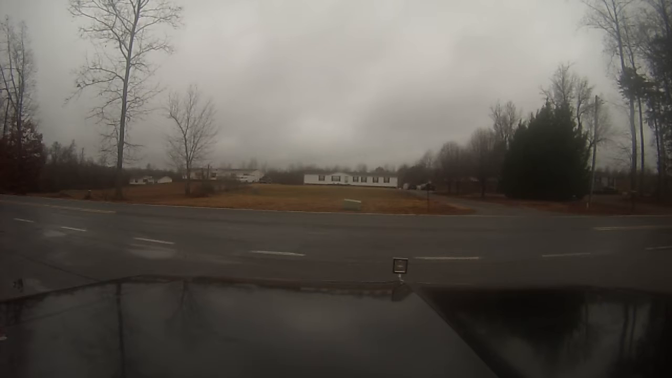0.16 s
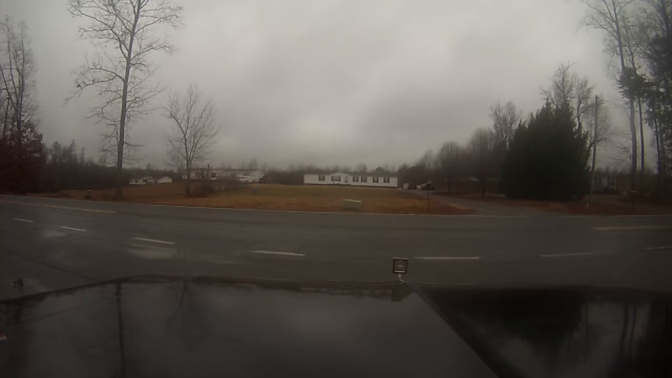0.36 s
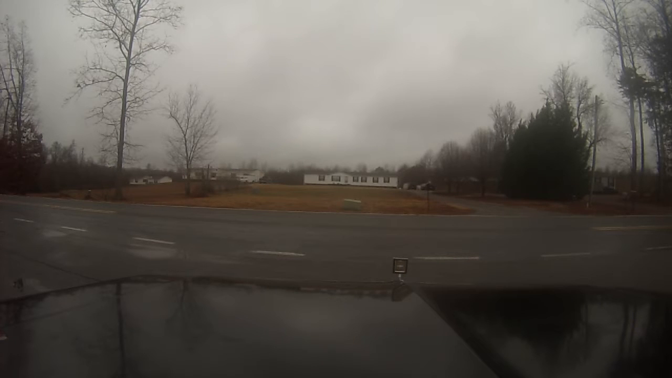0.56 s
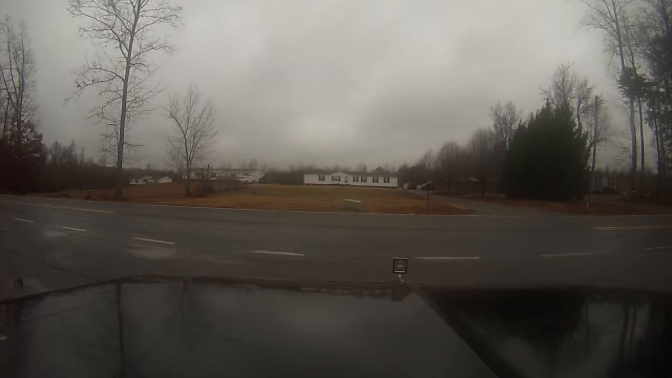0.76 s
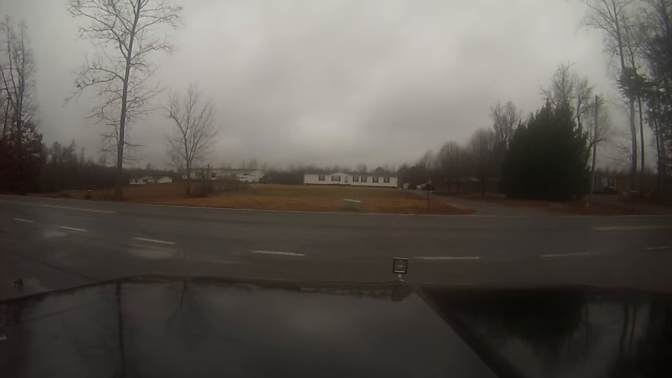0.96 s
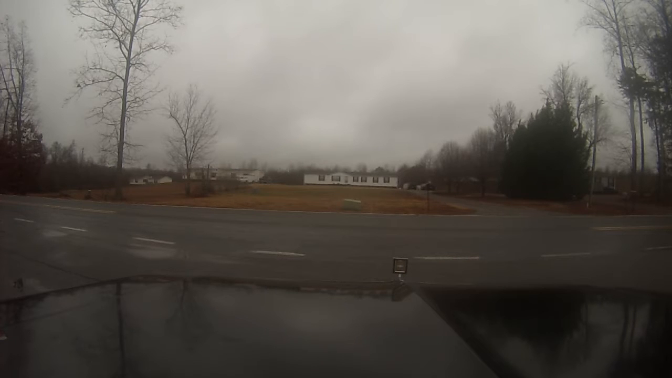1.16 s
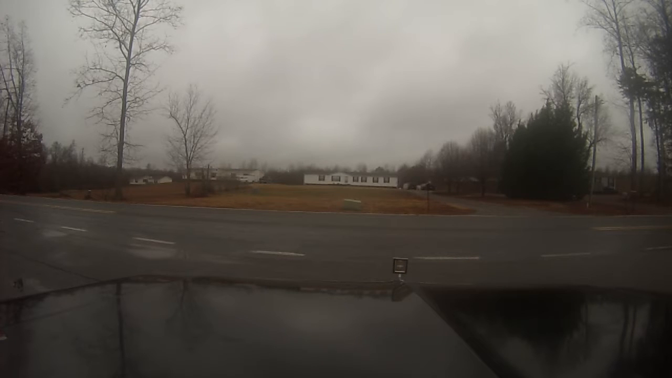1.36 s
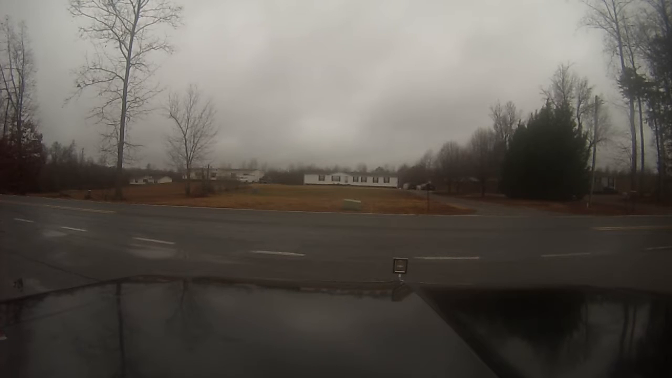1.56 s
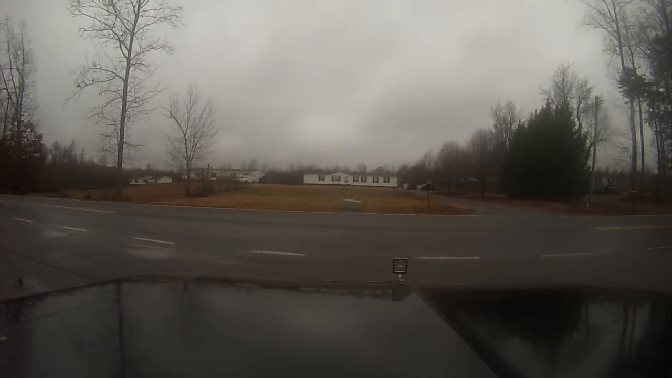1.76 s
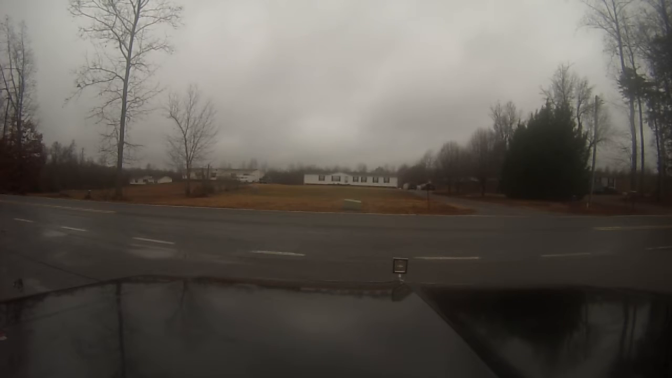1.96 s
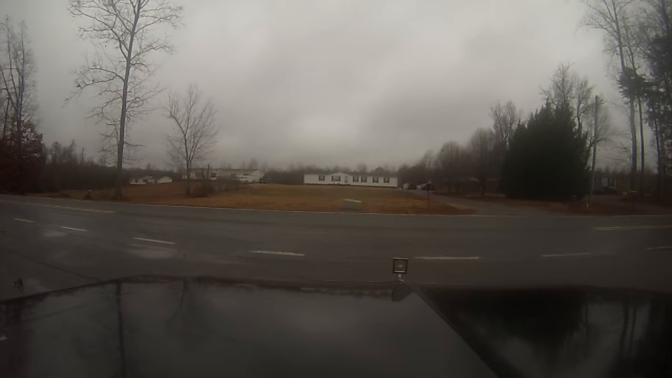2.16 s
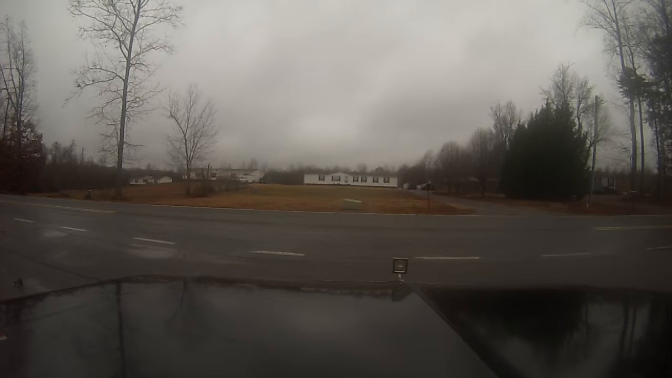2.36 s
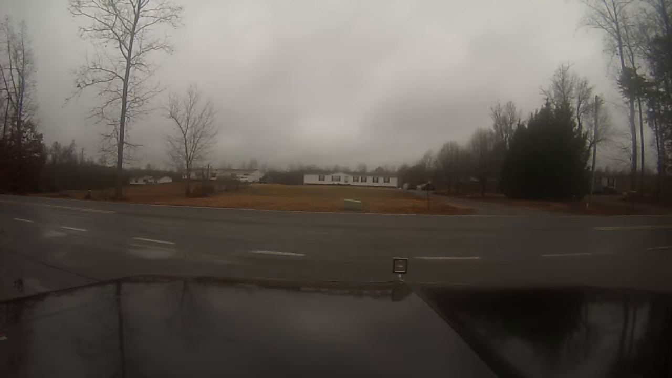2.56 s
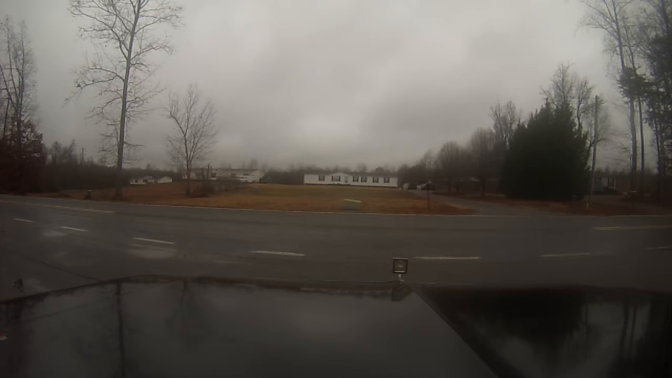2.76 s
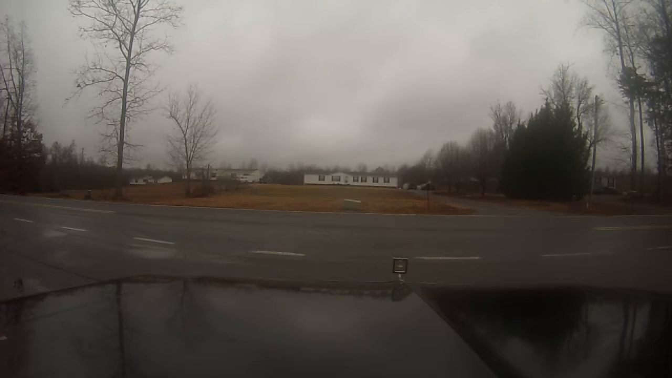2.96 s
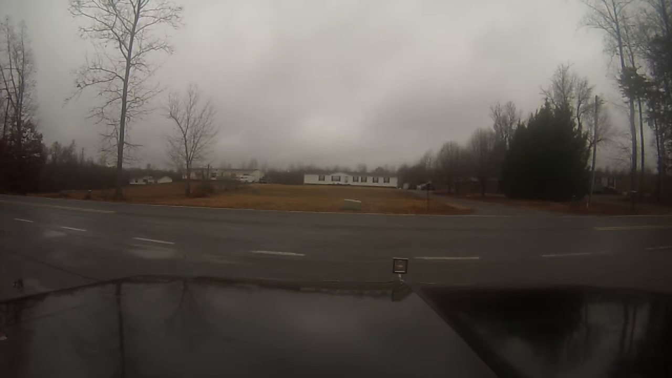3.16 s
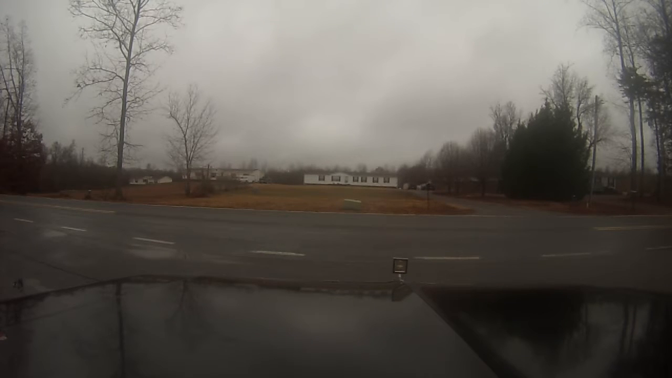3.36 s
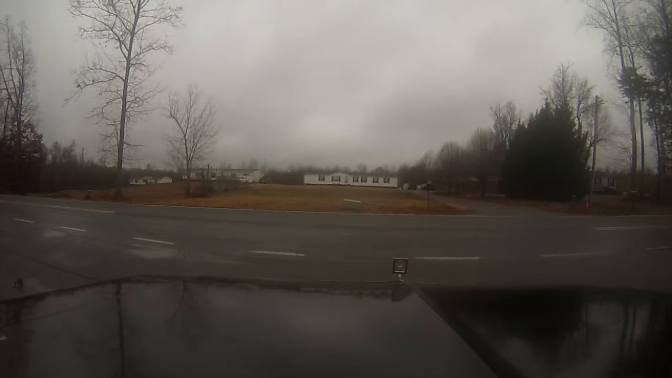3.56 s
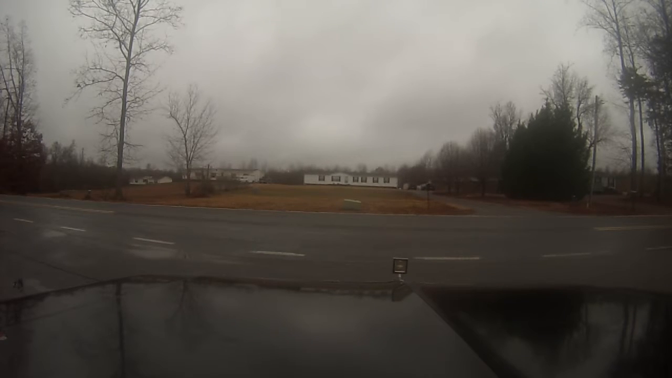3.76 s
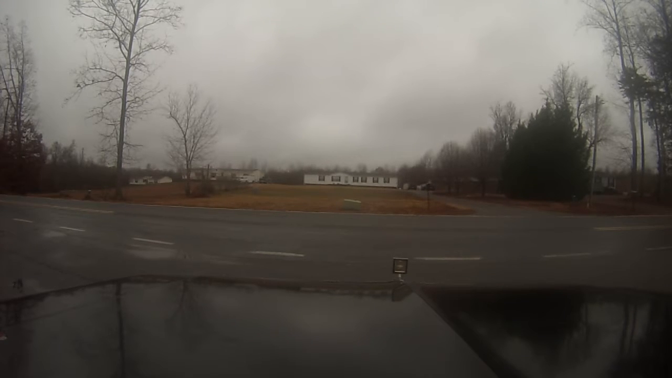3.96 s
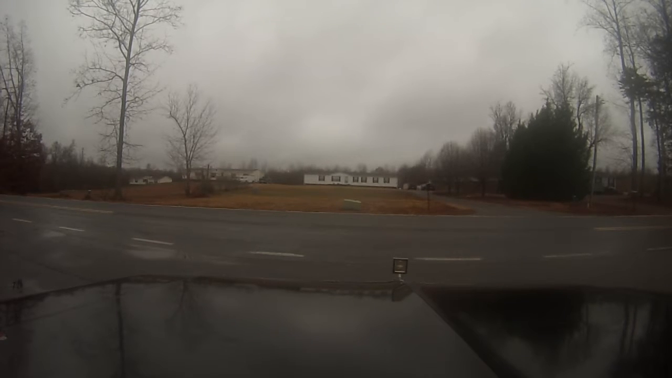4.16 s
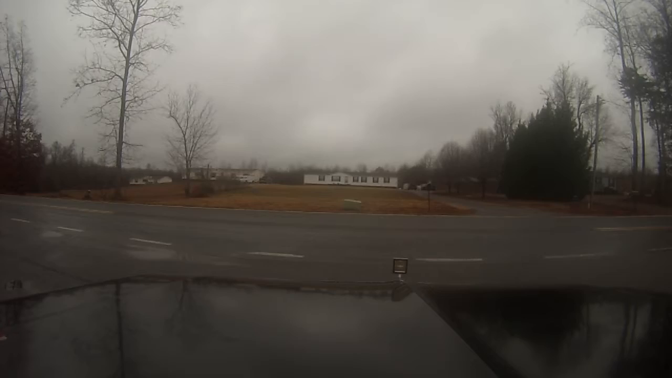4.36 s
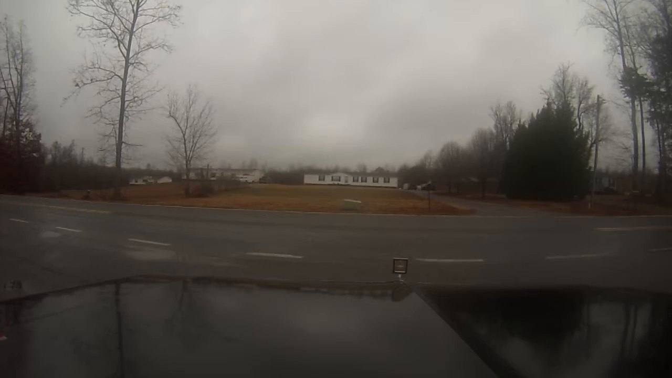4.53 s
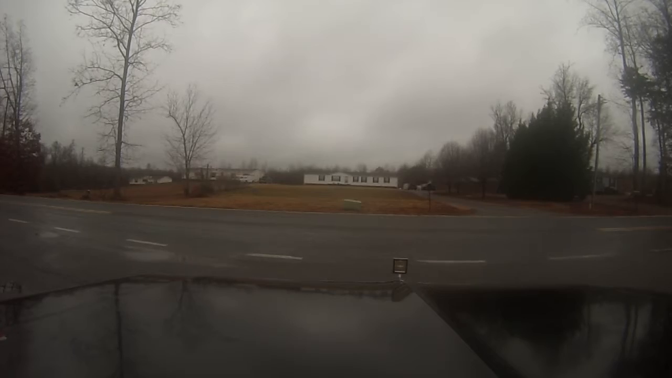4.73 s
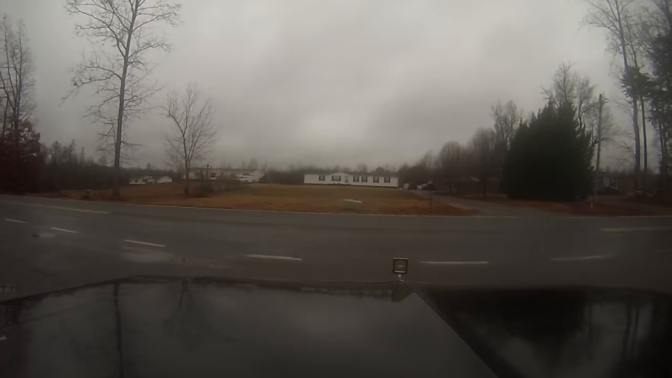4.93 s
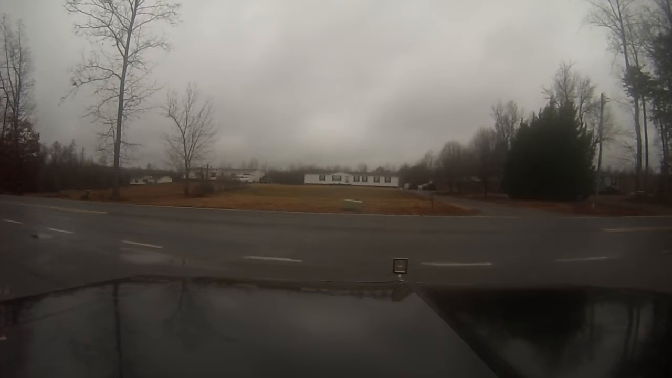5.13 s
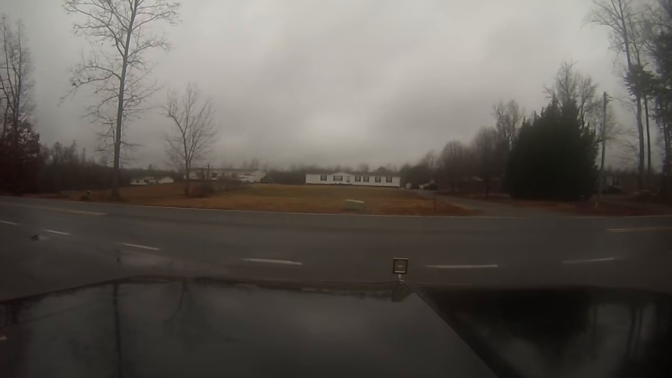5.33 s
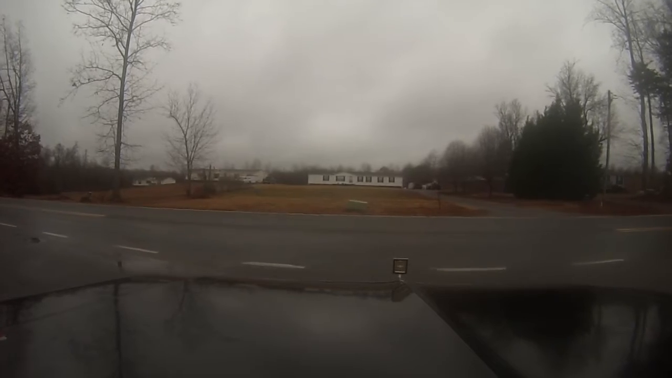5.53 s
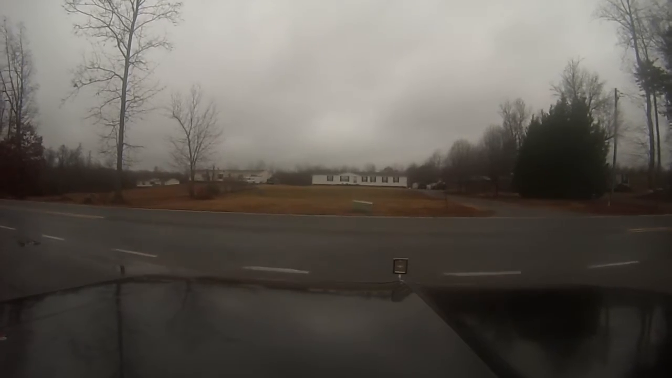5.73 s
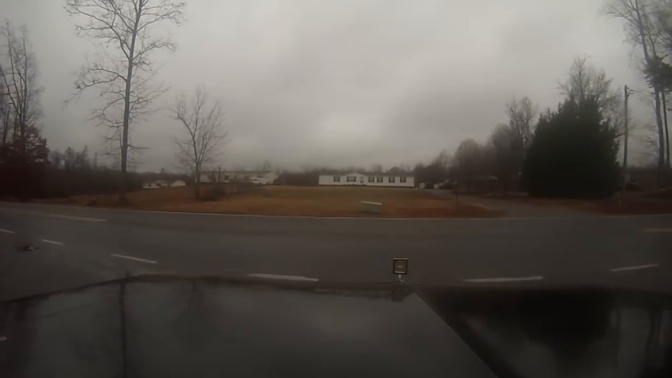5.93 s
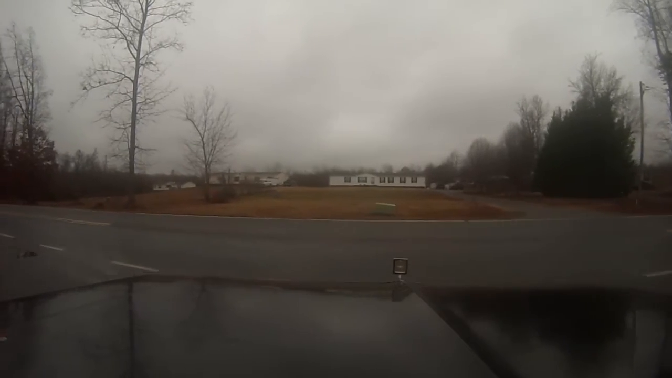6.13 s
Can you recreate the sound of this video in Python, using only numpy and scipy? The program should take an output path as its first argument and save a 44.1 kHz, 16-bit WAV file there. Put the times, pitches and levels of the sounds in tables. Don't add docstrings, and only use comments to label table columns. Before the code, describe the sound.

Lumpy truck idle heard from inside the cab for several seconds, then rising engine drone, intake hiss and ticking trim as it drives off.

```python
import sys
import numpy as np
from scipy import signal
from scipy.fft import rfft, irfft, next_fast_len
from scipy.io import wavfile
from scipy.ndimage import uniform_filter1d, map_coordinates

SR = 44100
rng = np.random.default_rng(int(sys.argv[2]) if len(sys.argv) > 2 else 0)


def wav_record(signal):
    frames = np.transpose(np.atleast_2d(signal))
    bounded = np.clip(frames, -1, 1)
    quanta = np.round(bounded * 32767).astype(np.int16)
    wavfile.write(sys.argv[1], SR, quanta)


def field_ratio(decibels):
    return 10 ** (np.asarray(decibels, dtype=float) / 20)


N = 277389


# time in seconds, crankshaft speed in turns per second.
CRANK_SPEED = [(0, 9.45), (1.5, 9.4), (3, 9.45), (4.5, 9.43), (4.7, 10.6), (5, 11.6), (5.15, 12.6),
               (5.4, 16.1), (5.55, 17.6), (5.7, 18.2), (5.76, 20.6), (5.85, 22.3), (5.95, 24.6),
               (6.05, 25.8), (6.15, 27.3), (6.29, 28.6)]


def crank():
    speed = curves(CRANK_SPEED)[0]
    revved = np.clip((speed - 9.5) / 8, 0, 1)
    return np.cumsum(speed) / SR, revved


# time in seconds, effort in dB over idle.
EFFORT = [(0, 0.5), (4.4, 0.5), (4.7, 2.5), (5, 3), (5.2, 5.5), (5.45, 7.5), (5.62, 9.5), (5.7, 11.5),
          (5.76, 14), (5.81, 12.5), (5.86, 14), (5.905, 8), (5.94, 13.5), (6.03, 5.5), (6.11, 10.5),
          (6.17, 10), (6.29, 13.5)]


def effort():
    return curves(EFFORT)[0]


CYLINDER_DB = [-6, -4, -1.5, -10.5, -15, -2, -10.5, -14]


def rumble(turns, scatter_db, noise_share):
    firing = np.floor(4 * turns).astype(int)
    at = np.flatnonzero(np.diff(firing))
    cylinder = firing[at] % len(CYLINDER_DB)
    scatter = scatter_db * rng.standard_normal(len(at))
    pulses = np.zeros(N)
    pulses[at] = field_ratio(np.take(CYLINDER_DB, cylinder) + scatter)
    pulses /= np.sqrt(np.gradient(4 * turns))
    push = np.sqrt(1 - noise_share) * pulses + np.sqrt(noise_share) * rng.standard_normal(N)
    return unit(filtered(push * field_ratio(0.96 * effort()), cab)) * field_ratio(-26.5)


# frequency in Hz, width in Hz, level in dB.
CAB_MODES = [(17, 5.9, -16), (62.3, 22, -10), (74.4, 12, -14.5), (97.2, 26, -6.5), (108.5, 9.2, -3.5),
             (143.1, 51, -4.5), (161.8, 11, -5), (199.5, 24, -6.5), (222, 23, -13), (263.4, 41, -11),
             (284.2, 15, -13), (301.2, 11, -15), (338.3, 22, -17), (355.6, 20, -15.5), (386, 16, -17),
             (402.1, 20, -16.5)]
# frequency in Hz, width in Hz, level in dB.
DOOR_ROOF_MODES = [(428, 30, -6), (465, 30, -6), (505, 40, -3), (540, 30, -9), (567, 16, -5)]


def cab(f):
    table = CAB_MODES + [(hz, width, db - 18.5) for hz, width, db in DOOR_ROOF_MODES]
    modes = np.array([(-1) ** k * field_ratio(db) * mode(f, hz, width) ** 2
                      for k, (hz, width, db) in enumerate(table)])
    residual = field_ratio(2 * -24) / (1 + (f / 260) ** 4) * (f > 45)
    power = np.sum(np.abs(modes) ** 2, axis=0) + residual
    return np.sqrt(power) * np.exp(1j * np.angle(modes.sum(axis=0)))


# multiple of shaft speed, level in dB rms.
LOW_ORDERS = [(4, -42), (5.5, -54), (8, -50), (12, -52), (2, -60), (2.5, -63), (16, -70)]
# order, time in seconds, peak in dB rms, length in seconds.
ORDER_SWEEPS = [(4, 5.2, -32, .15), (4, 5.45, -27, .1), (4, 5.62, -21.5, .07), (4, 5.84, -24, .035),
                (4, 6.13, -19, .16), (5.5, 5.53, -26, .1), (5.5, 6.2, -23, .15), (8, 4.7, -33, .09),
                (8, 5.15, -25, .07), (8, 5.6, -35, .3), (8, 6.25, -28, .2), (12, 5.02, -21, .07),
                (16, 5.47, -32, .08), (12, 5.55, -26, .13), (12, 6, -44, .3), (2, 5.87, -32, .15),
                (2, 6.24, -30, .1), (2.5, 5.85, -39, .2), (2.5, 6.18, -33, .1)]
# order, level in dB rms, unsteadiness in dB.
DRIVE_LINES = [(16, -42, 1.5), (18, -36, 1), (20, -50, 1.5), (24, -47, 1.5)]


def orders(turns, revved):
    out = np.zeros(N)
    for multiple, idle_db in LOW_ORDERS:
        crossings = [row[1:] for row in ORDER_SWEEPS if row[0] == multiple]
        out += swells(crossings, idle_db) * order(turns, multiple, 0.87 * wobble(8.9))
    for multiple, db, unsteady_db in DRIVE_LINES:
        out += order(turns, round(multiple), db - 90 * revved + unsteady_db * wobble(6))
    return out


def order(turns, multiple, level_db):
    phase = 2 * np.pi * (multiple * turns + rng.random()) + 0.42 * wobble(5.0)
    return np.sqrt(2) * field_ratio(level_db) * np.sin(phase)


# time in seconds, pitching in dB, bouncing in dB.
MOUNT_SHAKE = [
    (0, -60, -53),
    (.5, -53.5, -28.5),
    (2, -44, -35.5),
    (3.4, -45, -31),
    (3.75, -27.5, -30),
    (4.4, -28, -33),
    (5.05, -31.5, -43),
    (5.4, -27.5, -28.5),
    (5.95, -30, -30),
    (6.29, -40.5, -44),
]


def rocking():
    pitching_hz, beat_s, in_step_s = 19.2, .205, 3.73
    since = np.arange(N) / SR - in_step_s
    out = np.zeros(N)
    for hz, db in zip((pitching_hz, pitching_hz + 1 / beat_s), curves(MOUNT_SHAKE)):
        phase = 2 * np.pi * hz * since + .4 * wobble(6)
        out += np.sqrt(2) * field_ratio(db + 2.3 * wobble(5)) * np.sin(phase)
    return out


# time in seconds, peak in dB, length in seconds.
BOOM_SURGES = [(.19, -20, 0.034), (.42, -22, .06), (.62, -24, .05), (.84, -24.5, 0.052), (1.27, -22.5, .06),
               (1.47, -23, 0.081), (1.92, -24, .1), (2.57, -18.5, 0.051), (3.41, -20, 0.024),
               (3.72, -22.5, 0.04), (3.88, -26.5, .1), (4.04, -23.5, 0.046), (4.25, -33, .04),
               (4.67, -24, 0.047), (4.93, -17, .06), (5.19, -17, 0.033), (5.3, -15, 0.035),
               (5.47, -17, 0.027), (5.58, -15.5, 0.047), (5.86, -12.5, 0.051), (6, -12, 0.037),
               (6.13, -17, .03), (6.28, -13, 0.025)]


def boom(turns, revved):
    kick_at, kick_sharpness = 0.97, 6.1
    cycle = 2 * np.pi * (turns / 2 - kick_at)
    kick = np.exp(kick_sharpness * (np.cos(cycle) - 1)) * (1 - revved)
    bed_db = -32.5 + 0.49 * effort() + 9.5 * kick + 2.13 * wobble(9)
    return swells(BOOM_SURGES, bed_db) * field_ratio(-3.26) * wandering(hz=136.2, spread_hz=2.02, rate=14)


# time in seconds, peak in dB, length in seconds.
DRONE_SURGES = [
    (4.72, -34, .1),
    (5.0, -30.5, 0.091),
    (5.43, -25, 0.044),
    (5.62, -23.5, 0.046),
    (5.73, -24, 0.055),
    (5.96, -22, 0.032),
]


def floor_drone():
    bed_db = -39.5 + 1.09 * effort() + 2.0 * wobble(11)
    ring = wandering(hz=266 + 3 * wobble(5), spread_hz=7, rate=18)
    return swells(DRONE_SURGES, bed_db) * field_ratio(-4.0) * ring


# time in seconds, peak in dB, length in seconds.
PANE_SURGES = [
    (1.14, -37, 0.035),
    (2.42, -40.5, 0.016),
    (4.64, -39, 0.028),
    (5.31, -35.5, 0.042),
    (5.76, -30.5, 0.04),
]


def windscreen():
    bed_db = -48 + 0.33 * effort() + 4 * wobble(6)
    push = field_ratio(-7.5 + 3.3 * wobble(20))
    return swells(PANE_SURGES, bed_db) * push * wandering(hz=493.8, spread_hz=10.04, rate=24)


# time in seconds, peak in dB, length in seconds.
WHINE_SURGES = [
    (1.24, -45, 0.062),
    (2.96, -48, 0.037),
    (4.51, -36.5, 0.04),
    (5.65, -34.5, 0.046),
    (5.92, -34, 0.024),
]


def alternator():
    bed_db = -50 + 0.77 * effort() + 1.5 * wobble(5.5)
    push = field_ratio(-6 + 2.5 * wobble(35))
    return swells(WHINE_SURGES, bed_db) * push * wandering(hz=1414, spread_hz=24, rate=45)


# frequency in Hz, level in dB per Hz.
GEAR_SPECTRUM = [(250, -120), (500, -3.5), (700, -10), (1400, -3), (2200, -9.5), (2850, -20), (3100, -15),
                 (3900, -19.5), (4400, -21.5), (4650, -31.5), (5200, -63.5), (5600, -120)]


def gear_hiss(turns, revved):
    gate = 1 + 0.051 * np.cos(8 * np.pi * turns)
    gear = field_ratio(-46 + effort()) * gate * patchy(GEAR_SPECTRUM, depth_db=0.72)
    top = filtered(gear, lambda f: 1 / (1 + (2400 / (f + 1)) ** 8))
    low = filtered(gear, lambda f: 1 / (1 + (f / 1250) ** 6))
    return gear + (field_ratio(-4 * revved) - 1) * top + (field_ratio(2.9 * revved) - 1) * low


# frequency in Hz, level in dB per Hz.
AIR_SPECTRUM = [(3800, -120), (4500, -6.5), (4900, -1), (5600, -2.5), (5850, -5), (7000, -7), (8000, -9),
                (10000, -13.5), (12000, -18.5), (14000, -26), (15500, -37)]
# time in seconds, peak in dB, length in seconds.
INTAKE_GULPS = [
    (5.8, -59.5, 0.092),
    (5.95, -62, .03),
    (6.27, -61, 0.065),
]


def intake(revved):
    flutter = field_ratio(1.8 * revved * wobble(40))
    return swells(INTAKE_GULPS, -66.5 + 0.36 * effort()) * flutter * patchy(AIR_SPECTRUM, depth_db=0.9)


# frequency in Hz, width in Hz, height in dB over the trend.
DASH_MODES = [(770, 38, 10), (940, 50, 10), (1155, 60, 5), (1310, 90, 7), (1425, 100, 6), (1645, 65, 5),
              (1795, 45, 3), (1940, 45, 5), (2075, 120, 8), (2380, 160, 5), (2600, 120, 6), (3230, 160, 4),
              (4140, 90, 4), (4940, 120, 2), (6230, 120, 2)]


def dash(f):
    extra = sum((field_ratio(2 * abs(db)) - 1) * abs(mode(f, hz, width)) ** 4 for hz, width, db in DASH_MODES)
    return np.sqrt(1 + extra)


def patchy(spectrum, depth_db):
    z = signal.stft(rng.standard_normal(N), nperseg=512)[2]
    field = uniform_filter1d(rng.standard_normal(z.shape), size=5, axis=0)
    field = uniform_filter1d(field, size=8, axis=1)
    noise = signal.istft(z * field_ratio(depth_db * unit(field)), nperseg=512)[1][:N]
    hz, db = np.transpose(spectrum)
    return unit(filtered(noise, lambda f: field_ratio(np.interp(np.log(f + 1), np.log(hz), db)) * dash(f)))


# time in seconds, peak in dB, ring frequency in Hz.
TRIM_CHINKS = [
    (5.249, -49, 6670),
    (5.488, -52, 6800),
    (5.704, -47, 6850),
    (5.744, -49, 7000),
    (5.768, -42, 6220),
    (5.772, -52, 5000),
    (5.806, -48, 6800),
    (5.932, -48, 6200),
    (6.046, -52, 6700),
    (6.189, -53, 7900),
]


def chinks():
    out, t = np.zeros(N + SR), np.arange(SR // 20) / SR
    u = rng.random((90, 3))
    swarm = np.c_[5.3 + .97 * u[:, 0] ** .7, -65 + 9 * u[:, 1], 5600 + 2600 * u[:, 2]]
    for s, db, hz in [*TRIM_CHINKS, *swarm]:
        ring = np.sin(2 * np.pi * hz * t + np.cumsum(rng.normal(0, .08, len(t))))
        decay = field_ratio(db - 60 * t / .045)
        out[round(s * SR):][:len(t)] += decay * (1 - np.exp(-t / .002)) * ring
    return out[:N]


# time in seconds, peak in dB.
TRIM_TICKS = [
    (5.545, -52),
    (5.645, -52),
    (5.878, -48),
    (5.932, -45),
    (5.965, -49),
]


def ticks():
    out, t = np.zeros(N + SR), np.arange(SR // 20) / SR
    for s, db in TRIM_TICKS:
        decay = field_ratio(db + 3 - 60 * t / .02)
        out[round(s * SR):][:len(t)] += decay * rng.standard_normal(len(t))
    return filtered(out[:N], lambda f: mode(f, 6200, 5000) ** 3)


def mode(f, hz, width):
    return 1j * f * width / (hz * hz - f * f + 1j * f * width)


def wandering(hz, spread_hz, rate):
    return np.sqrt(2) * np.sin(2 * np.pi * np.cumsum(hz + spread_hz * wobble(rate)) / SR)


def swells(rows, bed_db):
    t = np.arange(N) / SR
    surges = sum(field_ratio(2 * db) * np.exp(-((t - s) / length) ** 2) for s, db, length in rows)
    return np.sqrt(field_ratio(2 * bed_db) + surges)


def filtered(x, response):
    m = next_fast_len(N + SR // 2)
    return irfft(rfft(x, m) * response(np.fft.rfftfreq(m, 1 / SR)), m)[:N]


def wobble(rate):
    steps = np.arange(0, N + 64, 64)
    knots = rng.standard_normal(400)
    return np.interp(np.arange(N), steps, map_coordinates(knots, [steps * min(rate, 60) / SR]))


def curves(rows):
    s, *cols = np.transpose(rows)
    return [np.interp(np.arange(N) / SR, s, c) for c in cols]


def unit(x):
    return x / np.sqrt(np.mean(x ** 2) + 1e-20)


def scene():
    turns, revved = crank()
    engine = rumble(turns, scatter_db=6.0, noise_share=0.94) + orders(turns, revved)
    body = rocking() + boom(turns, revved) + floor_drone()
    panels = windscreen() + alternator()
    air = gear_hiss(turns, revved) + intake(revved)
    trim = chinks() + ticks()
    return (engine + body + panels + air + trim)[None]


def band_limit(x):
    return signal.sosfilt(signal.butter(12, 15000, fs=SR, output="sos"), x)


def record(dry):
    return band_limit(dry)


dry = scene()
out = record(dry)
wav_record(out)
```